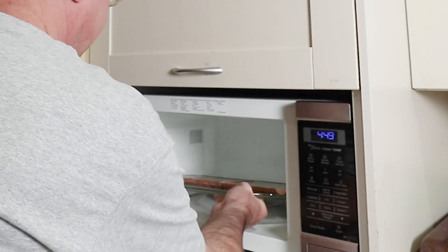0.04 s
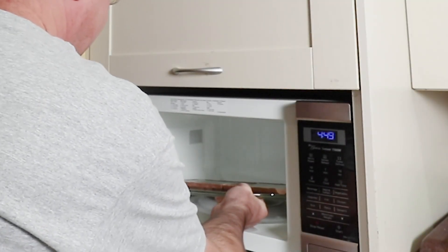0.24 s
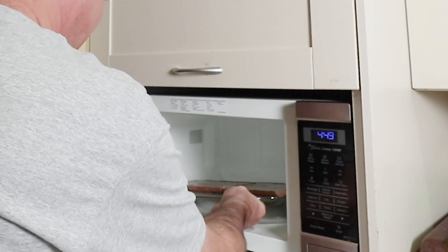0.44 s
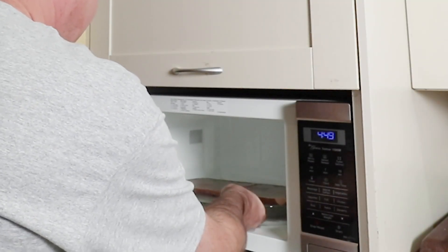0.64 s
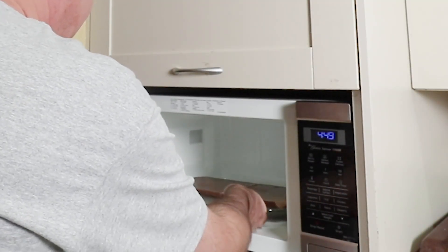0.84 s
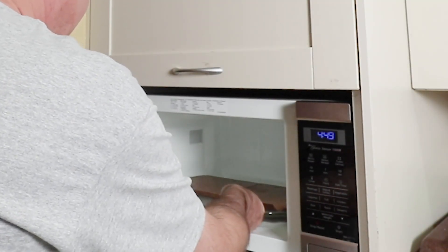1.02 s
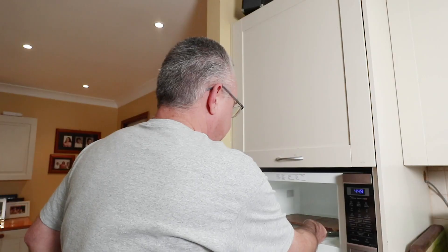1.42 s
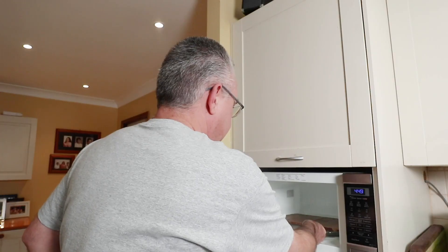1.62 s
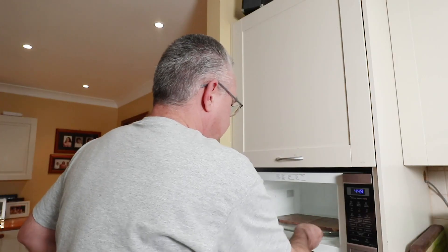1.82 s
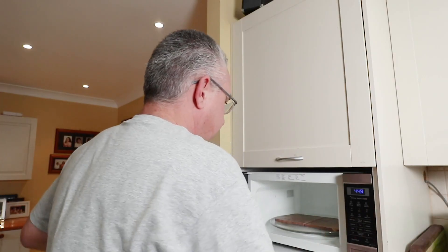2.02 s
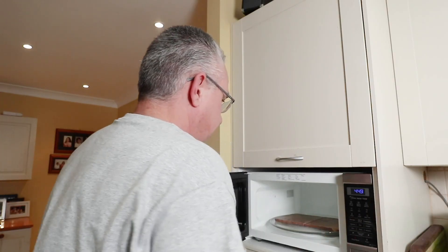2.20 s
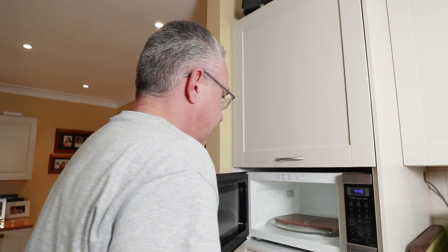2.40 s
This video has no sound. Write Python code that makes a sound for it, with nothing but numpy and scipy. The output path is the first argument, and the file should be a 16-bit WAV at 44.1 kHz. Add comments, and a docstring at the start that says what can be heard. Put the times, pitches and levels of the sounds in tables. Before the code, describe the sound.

A tray knocks and clatters onto a microwave's glass turntable in a quiet kitchen.

```python
"""Tray into a microwave

A tray knocks on the glass turntable of an open microwave, is set down, and chatters as it is nudged
into place. Hard hits ring the glass or the tray; hits and chatter thump the steel cabinet. The turntable
rumbles on its rollers, then the door ticks. A small, hard kitchen with a faint mains hum answers."""
import sys
import numpy as np
from scipy import signal
from scipy.fft import rfft, irfft
from scipy.io import wavfile

SR = 44100
rng = np.random.default_rng(int(sys.argv[2]) if len(sys.argv) > 2 else 0)


def file_out(sig):
    """Save sig as 16-bit WAV at sys.argv[1]."""
    # one column per channel
    cols = np.atleast_2d(sig).T
    # limit, then scale
    lim = np.clip(cols, -1, 1)
    pcm = np.round(lim * 32767).astype(np.int16)
    wavfile.write(sys.argv[1], SR, pcm)


N = 112454

# hard hits on the turntable, then the tray's edges landing: t/s, ring level/dB, crack/dB, thump/dB
KNOCK_CUES = [(.2455, -1, 3.5, -0.5), (.2785, -14.5, -4, -13), (.2875, -25.5, -20, -10.5),
              (.3208, -2, 1, -5.5)]
LANDING_CUES = [(.7832, -2, -23, -34), (.7892, -3, -15, -6)]
# the tray chatters into place: t/s, level/dB, low-pass f/Hz, thump/dB
CHATTER_CUES = [(1.037, -2, 3150, -21), (1.063, -6.5, 2400, -20), (1.103, -1.5, 2370, -44),
                (1.134, -1, 2600, -15.5), (1.173, -3.5, 3450, -21), (1.197, -26, 2600, -46),
                (1.24, -9.5, 3400, -56), (1.270, -18, 2380, -32.5), (1.289, -16, 2320, -30),
                (1.344, -13.5, 3300, -23), (1.381, -31, 2394, -53), (1.414, -32, 1200, -22),
                (1.620, -32.5, 1510, -48), (1.671, -19.5, 1790, -44), (1.709, -20, 1094, -42),
                (1.897, -19.5, 1100, -57), (1.943, -24.5, 1105, -45), (1.986, -19.5, 1300, -62)]
# ticks of tray and door: t/s, level/dB, tilt/(dB per octave), t60/s, ping f/Hz
TICK_CUES = [(1.133, 6.5, -4.5, 0.12, 1950), (1.823, -11.5, 0.5, 0.045, 3660),
             (2.233, -0.5, -1, 0.018, 371), (2.25, -16.5, 2.5, 0.055, 5000), (2.301, -14, 3, 0.038, 2000),
             (2.312, -7.5, 1.5, .1, 1600), (2.437, -2.5, -2.5, 0.14, 1520)]
# modes of the glass turntable, the tray and the steel cabinet: f/Hz, level/dB, t60/s
GLASS_MODES = [(462, -33, 0.067), (559.5, -18.5, 0.11), (688.7, -12, 0.093), (779, -27.5, 0.27),
               (844, -6.5, 0.012), (1071, -23, .13), (1131.6, -11, 0.06), (1130, -24, 0.088),
               (1845, -37, 0.22), (2400, -37.5, 0.21), (3031, -26.5, 0.13), (3520, -38.5, .14),
               (4180, -38.5, .12)]
TRAY_MODES = [(641.5, -42, 0.11), (760, -33.5, 0.18), (1236, -26, 0.078), (1313, -33.5, 0.13),
              (1510, -56, .12), (2010, -45, 0.115), (2180, -68, 0.098), (2247, -52, .08), (2690, -53, 0.12),
              (4570, -47, .11)]
CABINET_MODES = [(78, -53, .4), (114, -38.5, 0.39), (168, -26.5, 0.22), (196.6, -24.5, 0.16),
                 (224.7, -30.5, 0.24), (337.4, -35, 0.25)]
# tone of the dense ring of knocks, landings and chatter: f/Hz, level/dB
KNOCK_EQ = [(40, -54.5), (150, -32), (400, -40.5), (530, -12), (750, -7.5), (930, -5), (1170, 0.5),
            (1420, -14), (1800, -4), (2300, -16), (3300, -22), (4500, -32), (5500, -61), (15000, -64.5)]
LANDING_EQ = [(40, -55), (150, -35), (430, -16), (750, -5), (1000, -17.5), (1300, -1.5), (1650, -15),
              (2200, -7.5), (2750, -20.5), (3400, -28.5), (4600, -34), (5500, -53), (15000, -101)]
CHATTER_EQ = [(30, -37), (90, -23.5), (300, -26), (430, -25.5), (760, -26), (950, -37), (1400, -34),
              (2000, -30.5), (2750, -37), (3200, -37), (3900, -58), (15000, -43)]
# tone of a hard hit's crack and of a tick: f/Hz, level/dB
CRACK_EQ = [(100, -77), (2000, -24), (4400, -29), (6000, -37.5), (9500, -34.5), (15500, -47.5)]
TICK_EQ = [(40, -65), (400, -45.5), (900, -46), (1600, -44), (2800, -47), (4000, -52), (5500, -55.5),
           (15000, -64.5)]
# how hard the rollers push: t/s, level/dB
ROLLER_PUSH = [(0, -27), (0.242, -27.5), (.3, -4), (.5, -3), (.72, -6.5), (1.0, -9), (1.15, -3.5),
               (1.4, -8.5), (1.5, -1.5), (1.55, -12), (1.66, -12.5), (1.85, -16), (2.15, -17.5),
               (2.34, -13.5), (2.55, -21.5)]
# tone of the rollers' rumble and of the room's air: f/Hz, level/dB
ROLLER_EQ = [(30, -46), (70, -34), (95, -31.5), (114, -22), (135, -35.5), (210, -35), (290, -51.5),
             (430, -46), (780, -40.5), (1000, -51.5), (2000, -52.5), (4000, -66.5), (15000, -83)]
AIR_EQ = [(22, -32.5), (48, -4), (75, -7.5), (170, -10.5), (250, -7.5), (500, -14.5), (900, -13),
          (1400, -21.5), (3000, -21), (5000, -26), (6500, -24.5), (15500, -28.5)]
# reverb time of the kitchen: f/Hz, t60/s
KITCHEN_DECAY = [(100, .7), (300, 0.81), (700, 0.47), (2000, 0.34), (4000, 0.36), (8000, .3),
                 (15000, 0.091)]
# partials of the mains hum: f/Hz, rms level/dB
HUM_PARTIALS = [(97, -90), (161.5, -71.5), (393, -78), (490, -80), (737.5, -90.5), (980, -85)]

KNOCK_T60_S, LANDING_T60_S, CHATTER_T60_S = 0.14, 0.049, 0.072
CRACK_RISE_S, CRACK_T60_S, THUMP_RISE_S = 0.00071, 0.11, .005
HIT_SNAP, CHATTER_SNAP = 1.7, 3  # opening pulse, relative to the noise after it
RADIATE_HZ = 457  # below this a plate pushes little air
PING_GAIN_DB, PING_T60_S = -49, 0.02
DRONE_HZ, DRONE_FULL_PUSH_DB = 105, -55
ECHO_DB, ECHO_DELAY_S = -11, .0074  # off the oven's back wall
REVERB_SEND_DB, PREDELAY_S = -8, .01
AIR_RMS_DB, HIGH_CUT_HZ = -69.5, 15900


def hard_hits(cues, modes, body_eq, body_t60):
    """Each hit layers the struck object's modes, a dense ring, a bright crack and the cabinet's thump."""
    out, radiation = 0, signal.butter(6, RADIATE_HZ, "high", fs=SR, output="sos")
    for start, db, crack_db, thump_db in cues:
        tone = signal.sosfilt(radiation, ring(modes))
        body = eq(burst(body_t60, HIT_SNAP), body_eq)
        crack = eq(burst(CRACK_T60_S) * swell(CRACK_RISE_S), CRACK_EQ)
        hit = undb(db) * (tone + body) + undb(crack_db) * crack + cabinet_thump(thump_db)
        out = out + at(hit, start)
    return out


def tray_chatter():
    """The tray slips and catches in light taps; softer contacts sound duller."""
    out = 0
    for start, db, cutoff_hz, thump_db in CHATTER_CUES:
        softness = signal.butter(4, cutoff_hz, fs=SR, output="sos")
        tap = signal.sosfilt(softness, burst(CHATTER_T60_S, CHATTER_SNAP))
        out = out + at(undb(db) * eq(tap, CHATTER_EQ) + cabinet_thump(thump_db), start)
    return out


def cabinet_thump(db):
    """The steel cabinet takes up a blow slowly and booms."""
    return undb(db) * ring(CABINET_MODES) * swell(THUMP_RISE_S)


def ticks():
    """Short dry clicks with a brief ping, the last ones from the door."""
    out = 0
    for start, db, tilt_db, t60, ping_hz in TICK_CUES:
        click = eq(burst(t60), TICK_EQ, tilt_db)
        ping = ring([(ping_hz, PING_GAIN_DB, PING_T60_S)])
        out = out + at(undb(db) * (click + ping), start)
    return out


def rollers():
    """The turntable's rollers rumble through the cabinet floor, which drones when they push hardest."""
    times, db = np.array(ROLLER_PUSH).T
    push = undb(np.interp(clock(), times, db))
    rumble = push * eq(rng.standard_normal(N), ROLLER_EQ)
    drone = undb(DRONE_FULL_PUSH_DB) * push ** 2 * np.sin(2 * np.pi * DRONE_HZ * clock())
    return rumble + drone


def kitchen_reverb(x):
    """Diffuse reflections die away in octave bands, the treble first."""
    spectrum = rfft(rng.standard_normal(N))
    octave = np.log2(np.arange(N // 2 + 1) * SR / N + 1)
    tail = 0
    for k in range(5, 16):
        band = irfft(spectrum * np.maximum(1 - abs(octave - k), 0), N)
        tail = tail + band * fade(lookup(KITCHEN_DECAY, 2 ** k))
    tail = tail / np.sqrt(np.sum(fade(t60=0.65) ** 2))
    return undb(REVERB_SEND_DB) * convolve(x, at(tail, PREDELAY_S))


def room_tone():
    """A bed of still air and the steady hum of a kitchen appliance."""
    air = eq(rng.standard_normal(N), AIR_EQ)
    hum = sum(np.sqrt(2) * undb(db) * np.sin(2 * np.pi * (hz * clock() + rng.random()))
              for hz, db in HUM_PARTIALS)
    return undb(AIR_RMS_DB) * air / np.std(air) + hum


def ring(modes):
    """Decaying modes; each blow lands elsewhere, so levels scatter by about 1 dB, with a slight detune."""
    t, scatter = clock(), rng.standard_normal((len(modes), 2))
    return sum(undb(db + offset_db) * fade(t60) * np.sin(2 * np.pi * hz * (1 + .003 * detune) * t)
               for (hz, db, t60), (offset_db, detune) in zip(modes, scatter))


def burst(t60, snap=0):
    """A contact: an opening pulse, then decaying noise for the ring of countless panel modes."""
    x = rng.standard_normal(N) * fade(t60)
    x[0] += snap
    return x


def eq(x, curve, tilt_db=0, size=4096):
    """Minimum-phase EQ along a curve, tilted per octave about 2 kHz."""
    hz = np.arange(size // 2 + 1) * SR / size
    db = lookup(curve, hz) + tilt_db * np.log2(np.maximum(hz, 250) / 2000)
    cepstrum = irfft(np.log(undb(db)))
    cepstrum[1:size // 2] *= 2  # folded so nothing rings ahead of the attack
    cepstrum[size // 2 + 1:] = 0
    return convolve(x, irfft(np.exp(rfft(cepstrum))))


def lookup(curve, hz):
    """Read a curve on a log-frequency axis."""
    freqs, values = np.array(curve).T
    return np.interp(np.log(hz + 1), np.log(freqs), values)


def convolve(x, response):
    """Pass a sound through an impulse response."""
    return signal.fftconvolve(x, response)[:N]


def at(x, start):
    """Delay a sound to its cue."""
    return np.concatenate([np.zeros(int(start * SR)), x])[:N]


def fade(t60):
    """Exponential decay by 60 dB in t60 seconds."""
    return np.exp(-np.log(1000) * clock() / t60)


def swell(rise_s):
    """Exponential attack to full level."""
    return 1 - np.exp(-clock() / rise_s)


def clock():
    """Seconds from the start."""
    return np.arange(N) / SR


def undb(db):
    """Decibels to gain."""
    return 10 ** (np.asarray(db) / 20)


def scene():
    """Mono mix: the contacts echo in the oven and the kitchen, over rollers and room tone."""
    knocks = hard_hits(KNOCK_CUES, GLASS_MODES, KNOCK_EQ, KNOCK_T60_S)
    landings = hard_hits(LANDING_CUES, TRAY_MODES, LANDING_EQ, LANDING_T60_S)
    contacts = knocks + landings + tray_chatter() + ticks()
    oven_echo = undb(ECHO_DB) * at(contacts, ECHO_DELAY_S)
    return (contacts + oven_echo + kitchen_reverb(contacts) + rollers() + room_tone())[None]


def record(dry):
    """A steep high cut takes the very top off the mix."""
    return signal.sosfilt(signal.ellip(10, .2, 80, HIGH_CUT_HZ, fs=SR, output="sos"), dry)


dry = scene()
out = record(dry)
file_out(out)
```